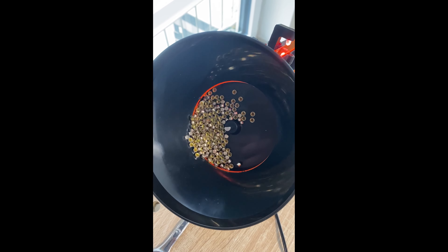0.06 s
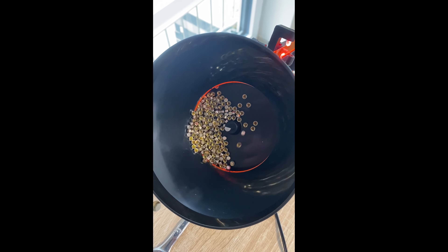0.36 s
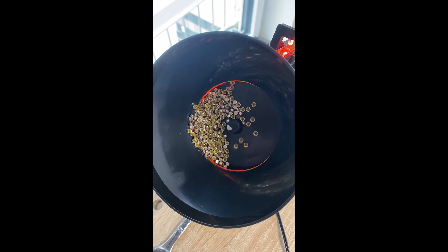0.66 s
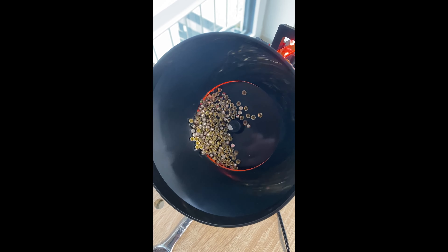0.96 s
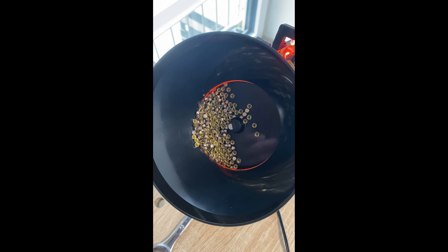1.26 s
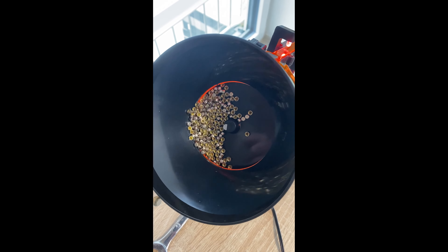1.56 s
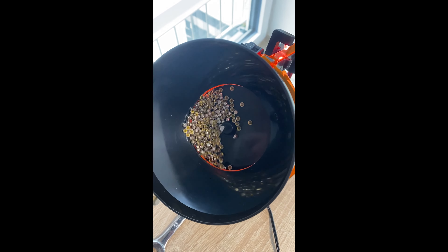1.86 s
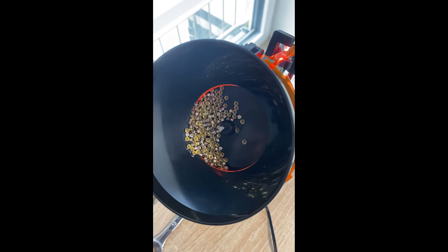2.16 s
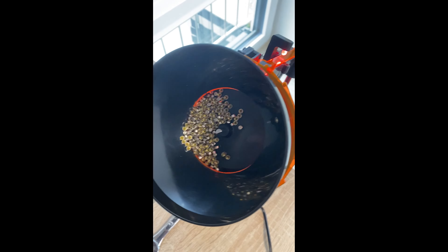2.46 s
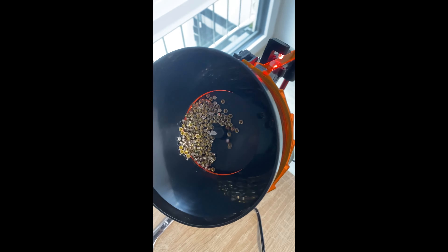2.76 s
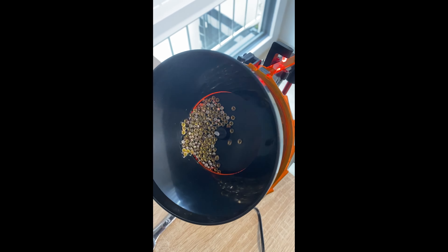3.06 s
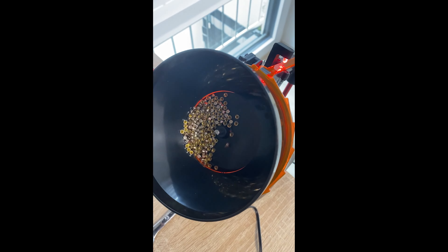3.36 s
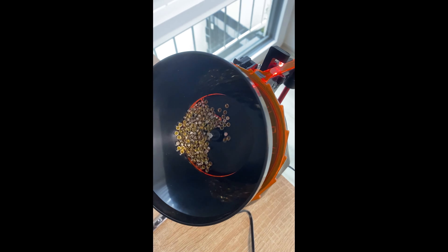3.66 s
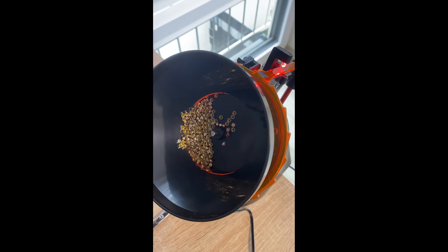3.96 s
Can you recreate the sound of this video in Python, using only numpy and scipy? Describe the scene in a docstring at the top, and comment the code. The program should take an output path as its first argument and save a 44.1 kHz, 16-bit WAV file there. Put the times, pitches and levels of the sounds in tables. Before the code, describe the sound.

Small metal pieces rattle in a plastic sorting bowl throughout, close by in a quiet room, with scattered sharp clacks and tiny pings. The rattle swells at the start and around 1, 2, 2.9 and 3.9 seconds. The mechanism knocks evenly, nearly four times a second, over a faint motor hum. Soft, dull handling thuds come from about 2.6 to 3.2 seconds and again at 3.8.

```python
"""Metal cups tumbling in a sorting bowl

Small metal primer cups tumble in the plastic bowl of a collator, close by in a quiet room. The heap
rattles in surges and single cups clack on the bowl. The mechanism knocks nearly four times a second:
a touch, a blow, a rebound and a return, all ringing the housing. A motor hums faintly underneath,
and a few dull handling thuds come in the second half."""
import sys
import numpy as np
from scipy import signal
from scipy.fft import rfft, irfft, next_fast_len
from scipy.io import wavfile
from scipy.ndimage import map_coordinates

SR = 44100
rng = np.random.default_rng(int(sys.argv[2]) if len(sys.argv) > 2 else 0)


def store_wav(level_fs):
    """Save 16-bit WAV to argv[1]."""
    pcm = np.round(np.clip(np.atleast_2d(level_fs), -1, 1) * 32767)
    wavfile.write(sys.argv[1], SR, pcm.T.astype(np.int16))


N = 4 * SR


def amp(db):
    """Turn decibels into a number to multiply by."""
    return 10 ** (np.asarray(db) / 20)


def unit(x):
    """Scale a sound to an average (rms) level of 1."""
    return x / np.sqrt(np.mean(x ** 2) + 1e-20)


def along(points, hz):
    """Read between (Hz, value) points on a log frequency scale."""
    f, v = np.transpose(points)
    return np.interp(np.log(hz + 1), np.log(f + 1), v)


def curve(rows, t):
    """Read between (seconds, value) points at times t."""
    return np.interp(t, *np.transpose(rows))


def filtered(x, response):
    """Change the level and phase of each frequency by response(Hz)."""
    size = next_fast_len(N + SR // 2)
    return irfft(rfft(x, size) * response(np.fft.rfftfreq(size, 1 / SR)), size)[..., :N]


def coloured(x, points, size=2048):
    """Shape the tone with (Hz, dB) points, so that nothing rings before its hit."""
    cepstrum = irfft(np.log(amp(along(points, np.fft.rfftfreq(size, 1 / SR)))))
    cepstrum[1:size // 2] *= 2
    cepstrum[size // 2 + 1:] = 0
    return signal.fftconvolve(x, irfft(np.exp(rfft(cepstrum))))[:len(x)]


def add(track, start_s, sound):
    """Mix a sound into a track at a given time."""
    i = max(round(start_s * SR), 0)
    track[i:i + len(sound)] += sound[:max(len(track) - i, 0)]


def fade(t, t60):
    """A fade that falls by 60 dB every t60 seconds."""
    return amp(-60 * t / t60)


def burst(t, t60, hold_s=0):
    """A puff of noise with energy 1 that holds, then dies away."""
    noise = rng.standard_normal(len(t)) * fade(np.maximum(t - hold_s, 0), t60)
    return noise / np.linalg.norm(noise)


def wander(t, per_s):
    """A smooth curve through per_s random values a second."""
    return map_coordinates(rng.standard_normal(N // 20), [t * per_s])


def resonance(f, hz, width):
    """How one resonance answers each frequency f: 1 at its centre, less to either side."""
    return 1j * f * width / (hz * hz - f * f + 1j * f * width)


# The motor's tones. Each row: pitch in Hz, level in dB.
MOTOR_TONES = [(148, -65), (259, -69)]
# The tone of the room noise and of the rumble. Each row: frequency in Hz, relative level in dB.
AIR_TONE = [(25, -19), (50, -12), (80, 0), (130, -2), (250, -4.5), (350, -9), (500, 3), (1000, -8),
            (4000, -5), (15000, -42)]
RUMBLE_TONE = [(25, -26), (70, 1), (110, -4), (150, 2.5), (200, -12), (350, -36), (1000, -70)]
# How the rumble swells. Each row: time in seconds, relative level in dB.
RUMBLE_LEVELS = [(0, -66), (2.55, -62), (2.66, -56), (2.85, -56), (3.08, -54), (3.25, -60), (3.79, -60),
                 (3.83, -54), (3.9, -54), (4, -56)]


def background(air_db=-49.5, rumble_db=-2, lump_db=4):
    """A motor hums over steady room noise and a low rumble that comes and goes."""
    def noise(tone):
        return unit(filtered(rng.standard_normal(N), lambda f: amp(along(tone, f))))

    t = np.arange(N) / SR
    hum = sum(amp(db) * np.sqrt(2) * np.sin(2 * np.pi * hz * t) for hz, db in MOTOR_TONES)
    lumps = amp(lump_db * wander(t, per_s=22))
    air = amp(air_db) * noise(AIR_TONE)
    rumble = amp(curve(RUMBLE_LEVELS, t) + rumble_db) * unit(lumps * noise(RUMBLE_TONE))
    return hum + air + rumble


# The surges of the sliding heap. Each row: time in seconds, relative level in dB.
HEAP_SURGES = [(0, -20.0), (0.08, -21.5), (0.2, -25), (0.28, -29.5), (0.335, -32.5), (0.38, -25),
               (0.44, -24), (0.48, -28.5), (0.53, -26.5), (0.595, -37), (0.65, -26), (0.8, -24),
               (0.89, -22), (0.98, -23), (1.04, -26.5), (1.11, -22), (1.2, -24), (1.3, -30), (1.38, -29),
               (1.48, -29.5), (1.56, -24), (1.63, -30.5), (1.7, -27.5), (1.77, -29), (1.87, -21.5),
               (1.96, -18), (2.04, -22), (2.15, -27), (2.26, -27.5), (2.34, -27.5), (2.41, -31),
               (2.49, -28.5), (2.54, -31), (2.62, -24), (2.72, -22.5), (2.83, -24.5), (2.93, -21),
               (3.05, -27), (3.16, -28.5), (3.25, -28.5), (3.36, -29), (3.5, -26.5), (3.6, -25),
               (3.69, -28.5), (3.8, -24.5), (3.88, -21), (3.93, -26), (3.98, -29)]
# The tone of its rattle. Each row: frequency in Hz, relative level in dB.
RATTLE_TONE = [(100, -53), (350, -27), (600, -8.5), (1100, -5.5), (1400, -8.5), (2200, -6), (3400, -2),
               (5000, -0.5), (6800, 1), (7700, -4.5), (9200, -0.5), (11000, -4), (12600, 1), (14000, -9),
               (15800, -9)]


def heap(level_db=-3.5, ticks_per_s=3000, tick_hz=6500, pitch_spread=0.579, scrape=0.77, clump_db=2):
    """Cups collide in the heap: thousands of tiny ticks, each with its own pitch, swelling in clumps."""
    t, age = np.arange(N) / SR, np.arange(300) / SR
    count = ticks_per_s * N // SR
    starts = rng.integers(N, size=(count, 1))
    hz = np.minimum(tick_hz * np.exp(pitch_spread * rng.standard_normal((count, 1))), SR / 2)
    strength = amp(-3.5 * np.minimum(rng.standard_normal((count, 1)), 2))
    scraping = scrape * rng.standard_normal((count, len(age)))
    ticks = strength * fade(age, t60=0.0056) * (np.sin(2 * np.pi * hz * age) + scraping)
    positions = starts + np.arange(len(age))
    rattle = np.bincount(positions.ravel(), ticks.ravel(), N)[:N]  # add each tick in its place
    clumps = amp(clump_db * wander(t, per_s=110))
    return unit(coloured(rattle * clumps, RATTLE_TONE)) * amp(curve(HEAP_SURGES, t) + level_db)


# The tone of a hopping cup. Each row: frequency in Hz, gain in dB.
HOP_TONE = [(600, -23), (2200, -10.5), (5000, -0.5), (10000, 0), (15800, -11)]


def hopping_cups(hops_per_s=28):
    """Loose cups hop on the heap with sharp ticks, louder when the heap surges."""
    out, t = np.zeros(N), np.arange(SR // 50) / SR
    for start in rng.uniform(0, N / SR, hops_per_s * N // SR):
        db = curve(HEAP_SURGES, start) + rng.uniform(22.5, 28.5)
        add(out, start, amp(db) * burst(t, t60=0.023))
    return coloured(out, HOP_TONE)


# The bowl's resonances. Each row: pitch in Hz, width in Hz, gain in dB.
BOWL_RESONANCES = [(1138, 114, -0.5), (2120, 190, 0), (2650, 210, -4.5), (4570, 47, 1), (5710, 40, -3)]
# One more narrow ring sinks slowly, then grows near the end. Each row: time in seconds, gain in dB.
RING_GAINS = [(0, 3), (3.3, -9), (3.5, 4), (4, 7.5)]


def bowl(cups, ring_hz=3464, ring_width_hz=130):
    """The plastic bowl adds its own ringing to whatever strikes it."""
    def response(f):
        return 1 + sum(amp(db) * resonance(f, hz, width) for hz, width, db in BOWL_RESONANCES)

    ring = filtered(cups, lambda f: resonance(f, ring_hz, ring_width_hz))
    return filtered(cups, response) + ring * amp(curve(RING_GAINS, np.arange(N) / SR))


# The notes the housing rings at. Each row: pitch in Hz, relative level in dB, seconds to fade by 60 dB.
HOUSING_NOTES = [(470, -7.5, 0.027), (498.2, -3, 0.064), (554.7, -5.5, 0.05), (611, -0.5, 0.025),
                 (690, -5, 0.049), (771, -11, 0.048), (1058, -5.5, 0.048), (1154, -4, .04),
                 (1630, 3.5, 0.035), (1818, -0.5, 0.015), (2090, 11, 0.018), (2333, 2.5, 0.019),
                 (2700, 5.5, 0.026), (3433, 5, .016)]


def contact(cutoff_hz, crack_db=-1, scatter_db=2):
    """One contact rings the housing with a noisy crack; a lower cutoff makes it sound softer."""
    t = np.arange(SR // 4) / SR
    ring = np.zeros(len(t))
    for hz, db, t60 in HOUSING_NOTES:
        strength = amp(db + scatter_db * rng.standard_normal())
        ring += strength * fade(t, t60) * np.sin(2 * np.pi * (hz * t + rng.random()))
    crack = amp(crack_db) * burst(t, t60=0.016, hold_s=0.003)
    rise = 1 - np.exp(-t / 0.0009)
    hit = (ring / np.linalg.norm(ring) + crack) * rise
    hit = signal.sosfilt(signal.butter(4, 403, 'high', fs=SR, output='sos'), hit)  # little bass
    return signal.sosfilt(signal.butter(2, min(cutoff_hz, SR / 2 - 1), fs=SR, output='sos'), hit)


# The mechanism's strokes. Each row: start in seconds, level in dB, brightness of the blow in dB
# (+6 doubles its cutoff), delay of the return in seconds, return level in dB, boom level in dB.
# The levels are relative: each part adds its own offset.
MECHANISM_STROKES = [(.087, 2.5, 7, 0.031, 2.5, -0.5), (0.349, 3, 5, 0.034, 4.5, -0.5),
                     (.613, 2, 5, 0.043, 4, 0), (0.8777, 1, 4.5, 0.031, 3, -6.5),
                     (1.148, 1, 6.5, .031, 5.5, -2.5), (1.411, 1, 5.5, .032, 0.5, -1.5),
                     (1.679, -1, 6.5, 0.029, 2, -6.5), (1.9423, 1, 20, 0.028, 2.5, -8.5),
                     (2.206, 1.5, 3, 0.037, 0, -7.5), (2.470, -3, 8, 0.026, 4, -3.5),
                     (2.738, 0, 7, .031, 5.5, -13.5), (3.004, -0.5, 18, 0.028, 1.5, -13),
                     (3.272, 2, 4, 0.033, 2.5, -1), (3.543, 2, 5.5, 0.033, 1, 0.5),
                     (3.81, -2, -5, 0.03, 3.5, -2)]


def mechanism(boom_hz=202.9, boom_rise_s=0.029, slack_hz=462, slack_rise_s=0.0061):
    """The drive takes up slack, then touches, strikes, rebounds and returns, while the frame booms."""
    out, t = np.zeros(N), np.arange(SR // 2) / SR
    boom_rise = 1 - np.exp(-(t / boom_rise_s) ** 2)
    boom_fade = fade(t, t60=0.17) + amp(-12.5) * fade(t, t60=0.66)  # the frame rings on faintly
    boom = np.sin(2 * np.pi * boom_hz * t) * boom_rise * boom_fade
    slack = np.sin(2 * np.pi * slack_hz * t) * t / slack_rise_s * np.exp(1 - t / slack_rise_s)
    for start, db, bright_db, return_s, return_db, boom_db in MECHANISM_STROKES:
        touch = amp(db + 4) * contact(cutoff_hz=2400)
        blow = amp(db + 6) * contact(cutoff_hz=5100 * amp(bright_db), crack_db=3.5)
        rebound = amp(db + 3) * contact(cutoff_hz=2880)
        return_knock = amp(return_db + 2.5) * contact(cutoff_hz=1570)
        add(out, start - 0.04, amp(-43.5) * slack)
        add(out, start, touch)
        add(out, start, amp(boom_db - 26) * boom)
        add(out, start + 0.006, blow)
        add(out, start + 0.0098, rebound)
        add(out, start + return_s, return_knock)
    return out


# Single cups hitting the bowl. Each row: start in seconds, relative levels of clack and tick in dB.
CUP_HITS = [(.0756, -29, -16), (0.2298, -36, -18), (0.2464, -23.5, -29), (.301, -20.5, -31),
            (.3952, -26, -15), (.5058, -21, -16), (.7125, -24, -34), (1.0612, -20, -20),
            (1.1305, -28.5, -25), (1.3386, -26, -21.5), (1.654, -31, -23.5), (1.8622, -25.5, -16.5),
            (1.9655, -26, -25), (1.994, -25, -19), (2.1196, -23.5, -23), (2.4423, -25, -19.5),
            (2.559, -41, -21.5), (2.7028, -37, -23.5), (2.8963, -22.5, -38), (2.9595, -23, -37),
            (3.0098, -25, -26), (3.4062, -31, -21.5), (3.426, -28.5, -34), (3.4635, -25.5, -17),
            (3.4908, -28, -42), (3.5216, -22, -26), (3.9205, -23, -34), (3.927, -23, -33)]
# The tone of the clack and of the tick. Each row: frequency in Hz, relative level in dB.
PLASTIC_TONE = [(300, -37), (1300, -18.5), (2300, -9.5), (3500, -3), (4800, 2.5), (6000, -5.5), (7500, -5),
                (15000, -47)]
METAL_TONE = [(1500, -32), (4500, -7.5), (6800, 10.5), (10000, 0.5), (12600, 2), (15800, -5)]
# Cups that ring on. Each row: start in seconds, pitch in Hz, level in dB.
CUP_PINGS = [(.395, 4800, -21), (.506, 4760, -14), (1.061, 5600, -17), (3.463, 3540, -27.5),
             (3.49, 3590, -24.5), (3.921, 3610, -24)]


def clacks():
    """Single cups hit the wall: a plastic clack, a metallic tick and sometimes a ping."""
    out, t = np.zeros(N), np.arange(SR // 10) / SR
    rise = 1 - np.exp(-t / 0.0008)
    for start, clack_db, tick_db in CUP_HITS:
        for tone, db in ((PLASTIC_TONE, clack_db + 24), (METAL_TONE, tick_db + 22.5)):
            hit = coloured(rise * burst(t, t60=0.014, hold_s=0.0035), tone)
            add(out, start, amp(db) * hit / np.linalg.norm(hit))
    for start, hz, db in CUP_PINGS:
        add(out, start, amp(db) * rise * fade(t, t60=0.04) * np.sin(2 * np.pi * hz * t))
    return out


# Soft bumps between the strokes. Each row: start in seconds, relative level in dB.
SOFT_BUMPS = [(0.464, -23), (0.733, -29), (0.995, -32.5), (1.225, -32), (1.473, -26), (1.801, -32.5),
              (2.327, -23.5), (3.642, -28)]


def bumps(gain_db=31.5):
    """Cushioned contacts: only the lowest notes of the housing answer."""
    out = np.zeros(N)
    cushion = signal.butter(2, 800, fs=SR, output='sos')
    for start, db in SOFT_BUMPS:
        add(out, start, amp(db + gain_db) * signal.sosfilt(cushion, contact(cutoff_hz=530)))
    return out


# Soft handling thuds. Each row: start in seconds, level in dB.
HANDLING_THUDS = [(2.649, -48.5), (2.716, -46), (2.78, -48), (2.873, -45), (2.951, -44), (3.05, -44.5),
                  (3.159, -51.5), (3.812, -39)]


def thuds(typical_hz=174.6, pitch_drop=0.42, glide_s=0.036, rise_s=0.014):
    """Handling makes dull thuds, each sagging in pitch."""
    out, t = np.zeros(N), np.arange(SR // 5) / SR
    swell = t / rise_s * np.exp(1 - t / rise_s)
    sag = 1 - pitch_drop * (1 - np.exp(-t / glide_s))
    for start, db in HANDLING_THUDS:
        hz = typical_hz * np.exp(0.12 * rng.standard_normal()) * sag
        add(out, start, amp(db) * swell * np.sin(2 * np.pi * np.cumsum(hz) / SR))
    return out


# Timing between the two sides. Each row: frequency in Hz, how far left leads in radians.
LEFT_LEAD = [(50, 0), (450, -.1), (800, -.3), (1290, -.6), (2000, .15), (2700, .65), (4100, 1), (5100, .25),
             (7000, 3.0), (7750, 3.4), (9730, 5.9), (10900, 6.5), (13200, 9.3), (14400, 9.8), (15800, 12.2)]
# Balance between the two sides. Each row: frequency in Hz, left minus right in dB.
LEFT_BALANCE = [(60, .4), (270, .8), (450, 2.3), (740, 3.2), (1220, 1.5), (2010, -1), (3000, -2), (5500, 0),
                (15000, 0)]


def direct_sound(x):
    """Sound reaches the left and right microphone openings with different timing and level."""
    side = np.array([[0.5], [-0.5]])
    return filtered(x, lambda f: amp(side * along(LEFT_BALANCE, f))
                    * np.exp(1j * side * along(LEFT_LEAD, f)))


# How long the room rings. Each row: frequency in Hz, seconds to fade by 60 dB.
ROOM_FADES = [(200, 0.31), (1500, 0.24), (6000, 0.043), (15000, 0.15)]


def room(x):
    """The room answers with a short wash of echoes, different on the left and right."""
    hz, t, spectrum = signal.stft(rng.standard_normal((2, SR // 2)), SR, nperseg=256)
    _, tail = signal.istft(spectrum * fade(t, along(ROOM_FADES, hz)[:, None]), SR, nperseg=256)
    delayed = np.pad(x, (SR // 200, 0))  # 5 ms late
    return signal.fftconvolve(delayed[None], tail / np.linalg.norm(tail[0]), axes=1)[:, :N]


def scene():
    """Knocks, cups and background, heard directly and through the room."""
    knocks = mechanism() + bumps()
    cups = bowl(heap() + hopping_cups() + clacks())
    backdrop = background() + thuds()
    into_room = amp(-13.5) * (knocks + backdrop) + amp(-9) * cups
    return direct_sound(knocks + cups + backdrop) + room(into_room)


def record(dry, top_hz=15850):
    """Cut away the very highest treble."""
    return filtered(dry, lambda hz: hz < top_hz)


dry = scene()
out = record(dry)
store_wav(out)
```